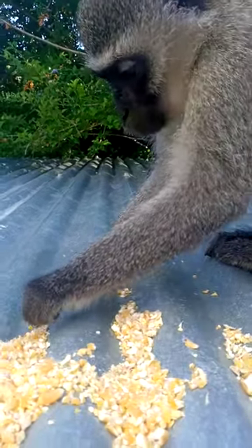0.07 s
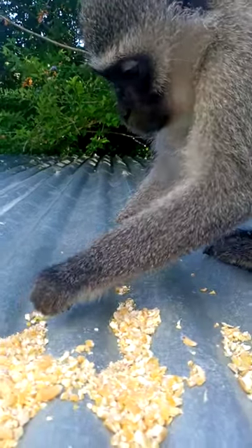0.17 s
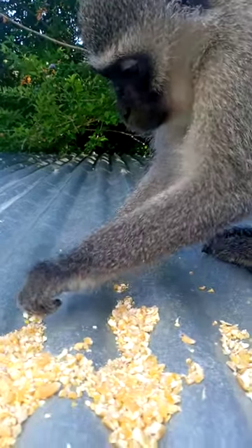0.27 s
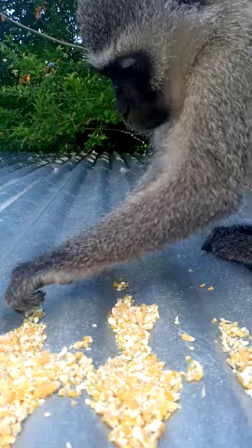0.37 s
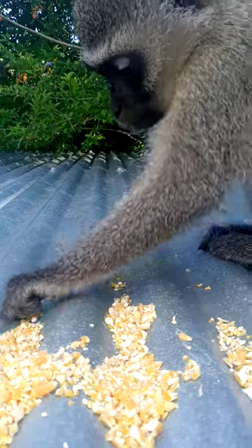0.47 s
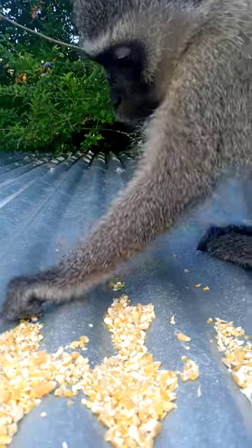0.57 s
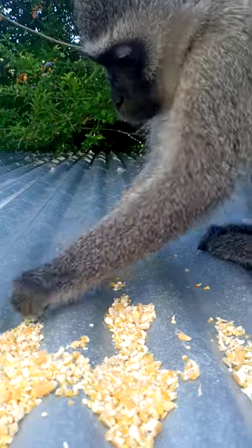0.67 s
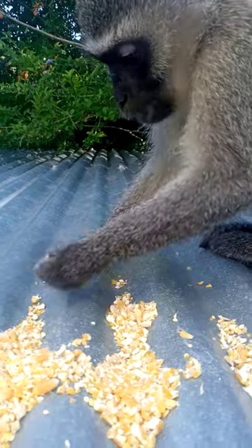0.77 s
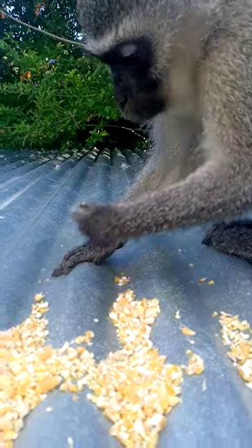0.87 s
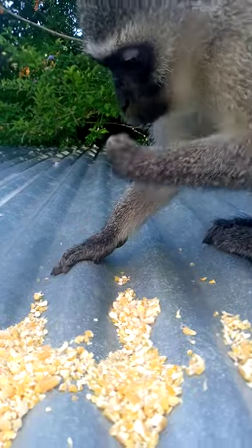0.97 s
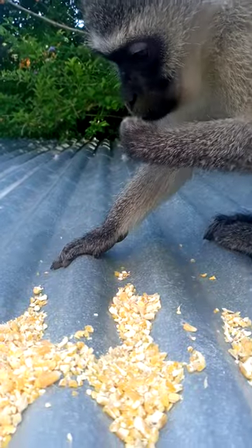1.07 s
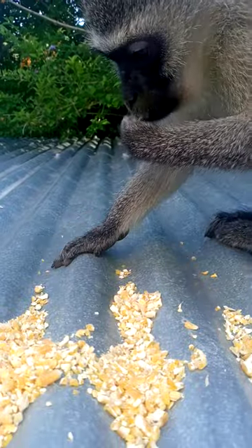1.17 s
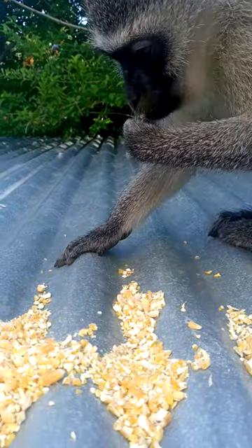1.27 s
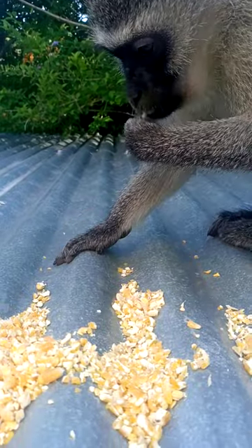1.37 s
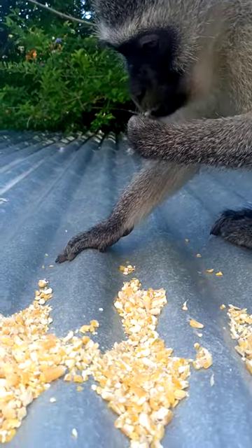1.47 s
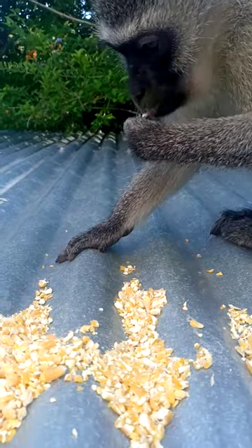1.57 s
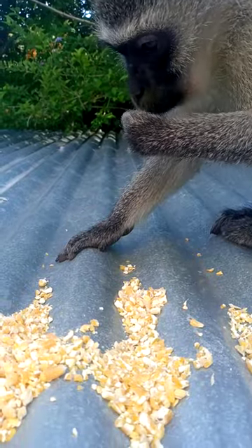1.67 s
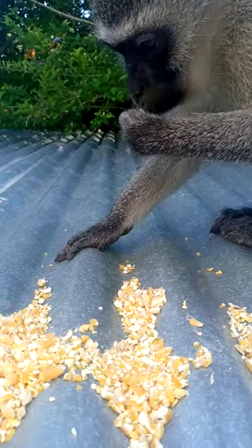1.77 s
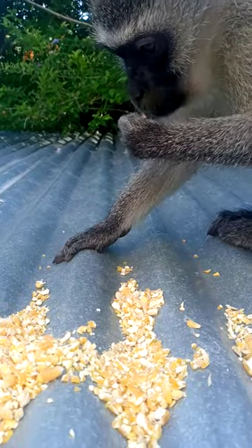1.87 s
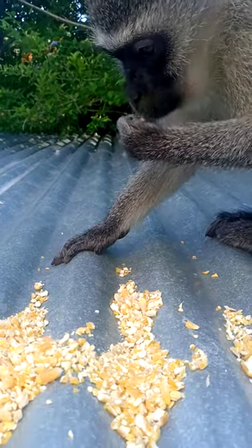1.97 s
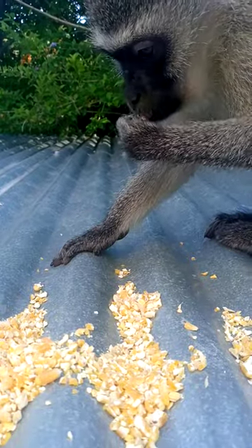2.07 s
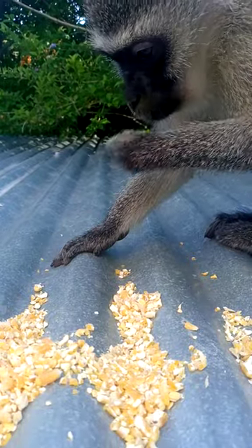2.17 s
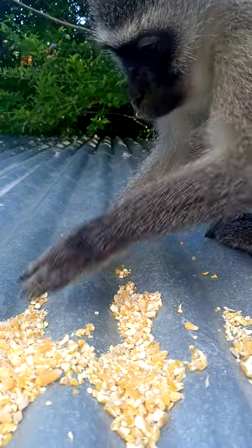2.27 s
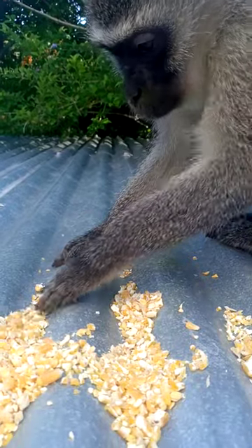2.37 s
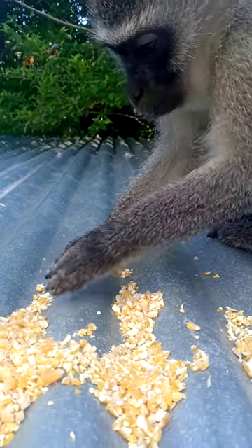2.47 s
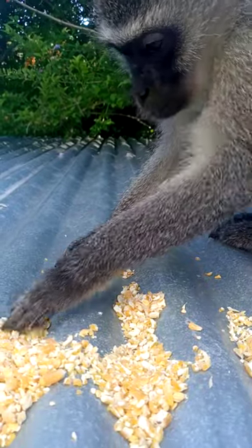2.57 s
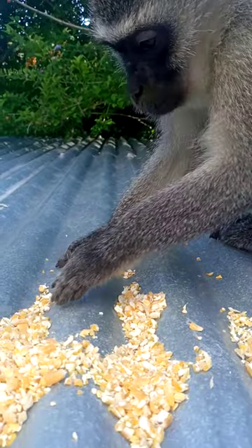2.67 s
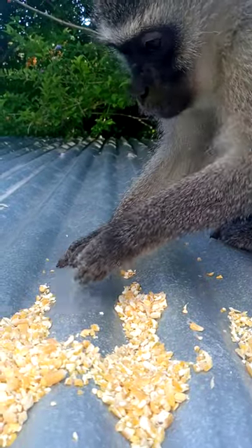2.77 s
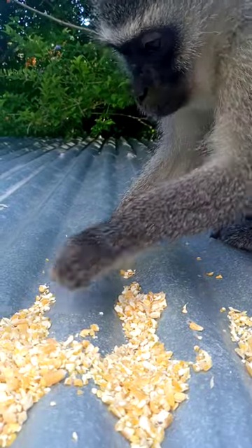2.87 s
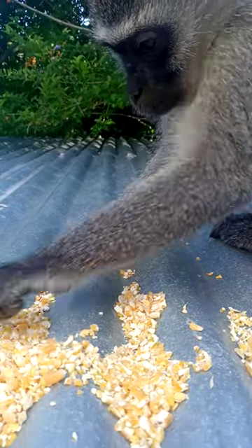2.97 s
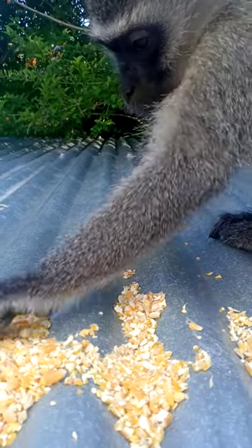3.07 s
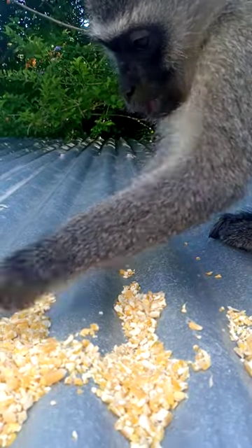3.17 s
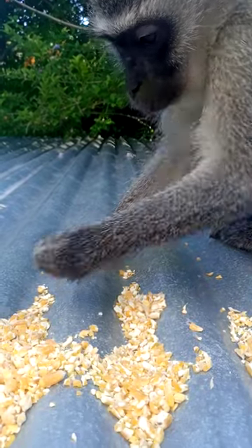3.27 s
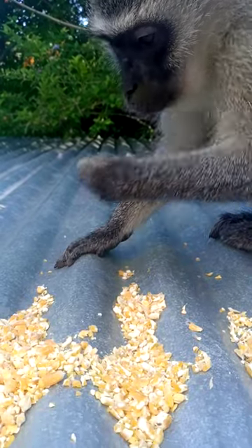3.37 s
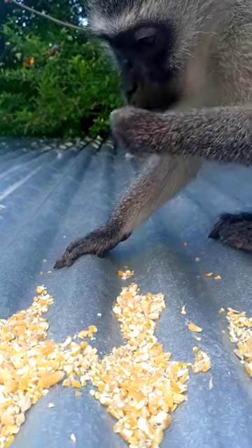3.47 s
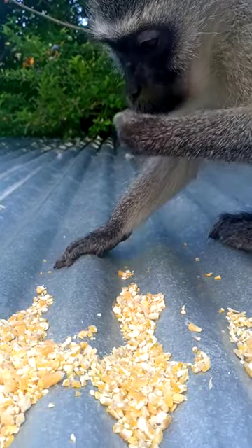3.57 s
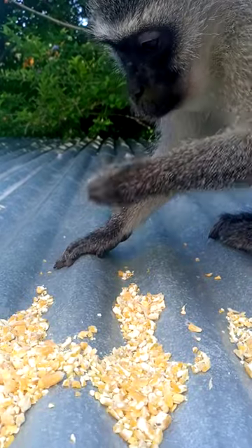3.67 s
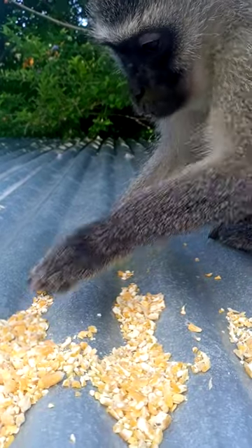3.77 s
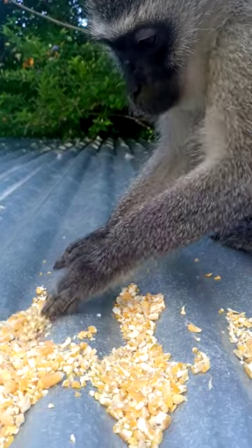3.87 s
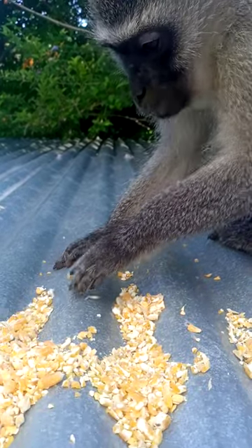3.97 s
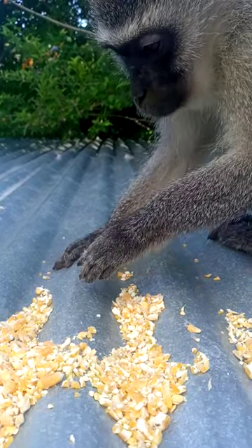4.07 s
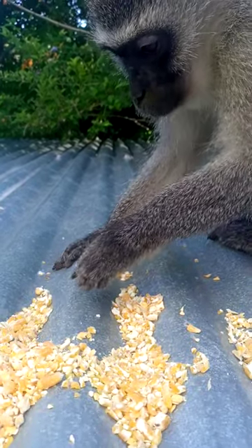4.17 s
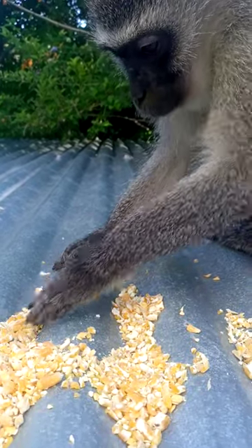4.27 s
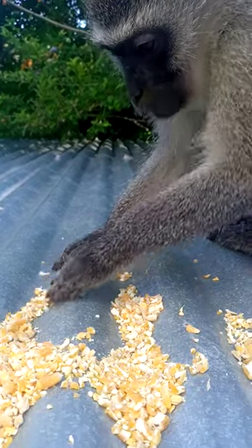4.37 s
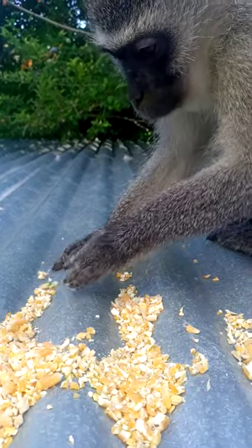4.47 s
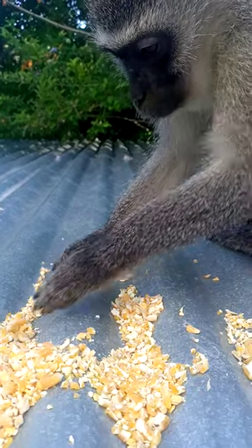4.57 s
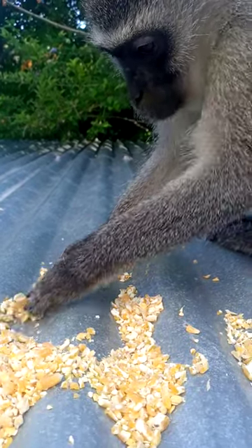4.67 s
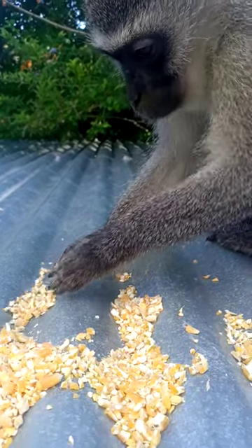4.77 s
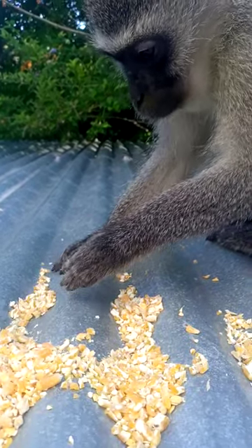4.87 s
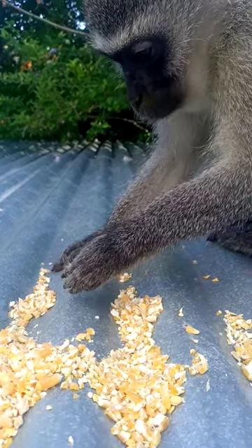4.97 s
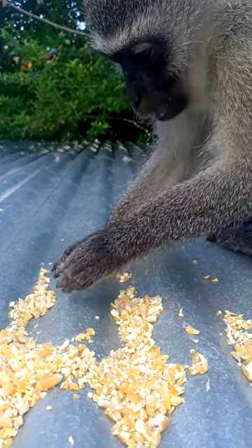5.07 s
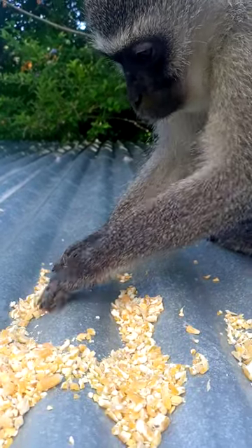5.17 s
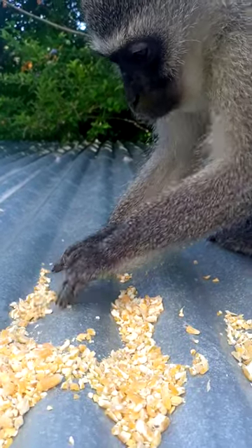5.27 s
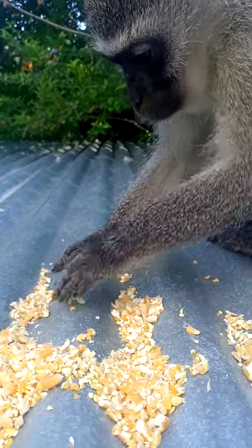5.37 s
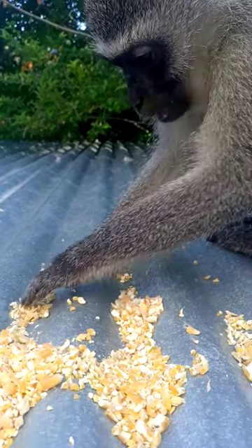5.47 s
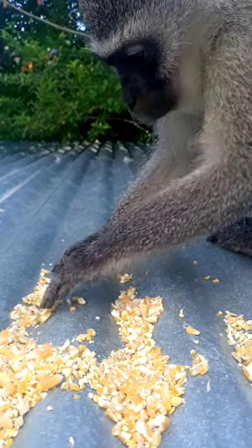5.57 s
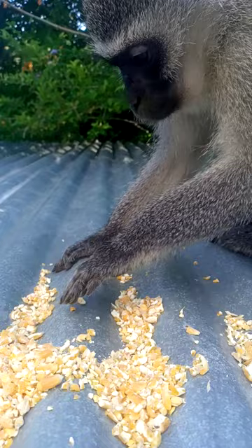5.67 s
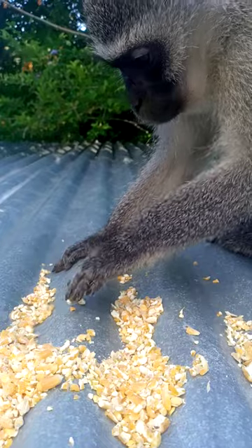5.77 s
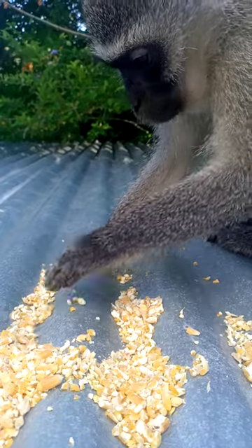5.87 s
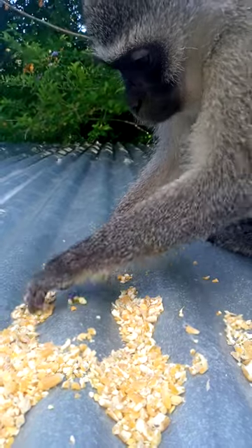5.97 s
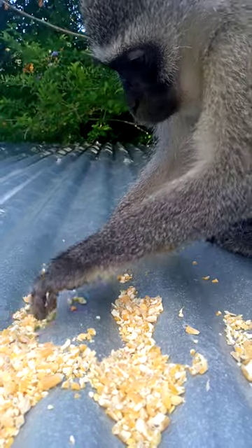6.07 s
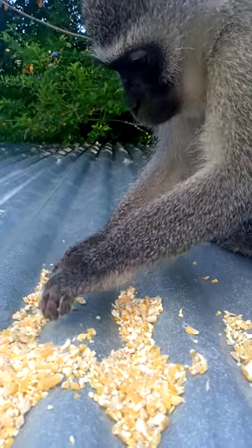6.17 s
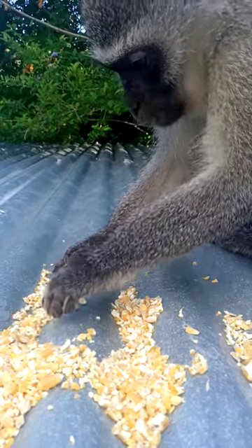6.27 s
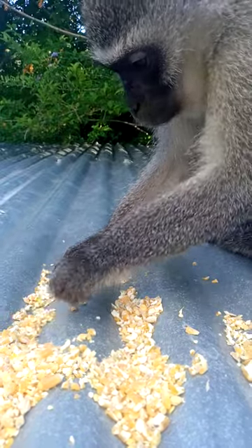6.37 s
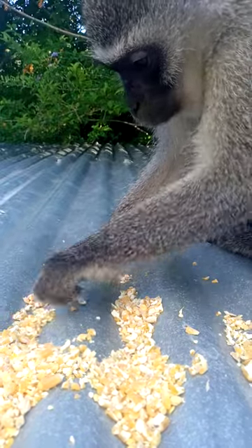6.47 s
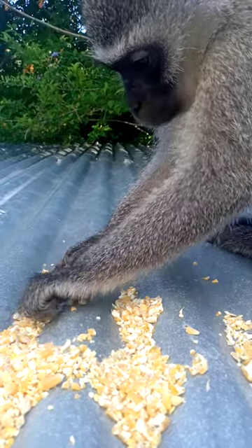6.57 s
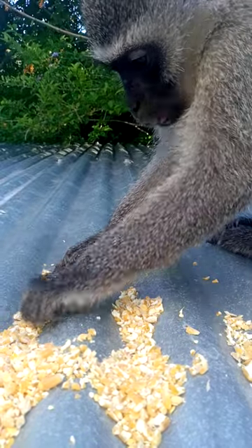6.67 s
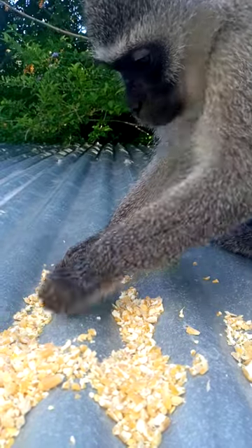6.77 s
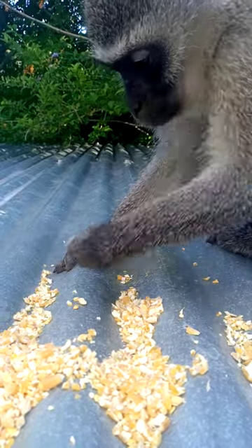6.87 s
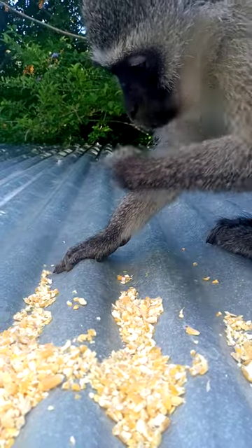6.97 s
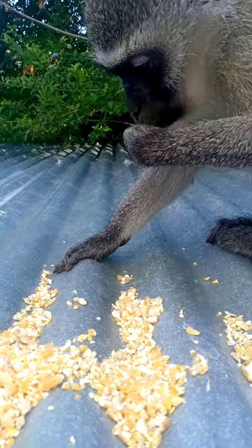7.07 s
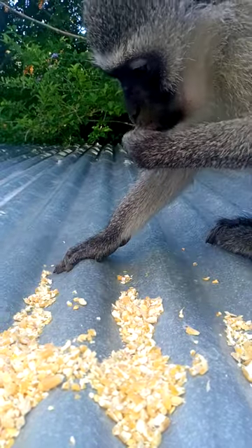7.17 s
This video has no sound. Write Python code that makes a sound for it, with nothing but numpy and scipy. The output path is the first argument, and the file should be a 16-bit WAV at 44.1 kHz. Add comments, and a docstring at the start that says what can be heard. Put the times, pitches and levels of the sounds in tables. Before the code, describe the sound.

A close microphone on a metal roof catches dried kernels ticking, scratching and knocking under short hand strokes, with small dull thuds as weight shifts. An opening scrabble gives way to light tooth clicks and crumbly crunches, then repeated rattling rakes with a dense flurry of hard taps, and finally chewing between strokes. Small birds whistle faintly in the garden, over distant low rumble and airy hush.

```python
"""Dry corn skitters and knocks on a corrugated metal roof, close by, as a monkey rakes it and chews on and off.
Stroke gains shape random kernel clicks that drive the resonances of the sheet; hard knocks are noise bursts.
Chewing is thin bright cracks, and the roof thuds as dying sine tones when its weight shifts.
Birds whistle behind as gliding sines, blurred by foliage, over a low outdoor rumble, hush and air of shaped noise."""
import sys
import numpy as np
from scipy import signal
from scipy.fft import rfft, irfft, next_fast_len
from scipy.io import wavfile
from scipy.ndimage import uniform_filter1d, map_coordinates

SR = 44100
rng = np.random.default_rng(int(sys.argv[2]) if len(sys.argv) > 2 else 0)


def materialize(psi):
    """Save the field psi as 16-bit PCM at rate SR to the path in sys.argv[1].

    A 1-D psi becomes a single channel; in a 2-D psi each row is a channel.
    """
    bounded = np.clip(np.atleast_2d(psi).T, -1, 1)
    quanta = np.round(bounded * 32767).astype(np.int16)
    wavfile.write(sys.argv[1], SR, quanta)


N = 318843

# Strokes of the hand through the corn. Each row: start in seconds, push in seconds, kernel rattle in dB before
# the mix, scrape on the sheet in dB above it, landing weight in dB before the mix, settling in dB per second.
STROKES = [(0.0, 0.029, -51.5, 1, -82, 211), (0.313, 0.086, -62.5, 5.5, -55, 150),
           (.445, .04, -63, -4, -54.5, 150), (.49, 0.14, -51, -2, -51, 128),
           (2.346, 0.084, -38.5, -3, -44.5, 170), (2.591, 0.0071, -43, 7.5, -44.5, 259),
           (2.704, 0.0089, -53.5, -11, -79, 130), (3.042, .015, -38, -12, -76, 252),
           (3.06, 0.0099, -37.5, 4.5, -49, 284), (3.223, 0.012, -55, -25, -78, 147),
           (3.846, 0.12, -40, -0.5, -52, 214), (4.034, 0.037, -44.5, -4, -75, 157),
           (4.32, 0.038, -36, -6.5, -56, 198), (4.409, 0.13, -42.5, -8, -83, 167),
           (4.643, 0.085, -33.5, -4.5, -47, 223), (4.801, 0.017, -43, 0, -48.5, 146),
           (5.19, 0.073, -38.5, -0.5, -55, 115), (5.41, 0.047, -61.5, 8.5, -80, 150),
           (5.501, 0.08, -36, -1, -47, 162), (5.631, 0.059, -43, 1, -74, 261),
           (5.98, 0.041, -36, -6, -53.5, 116), (6.17, 0.15, -64, -19, -78, 197),
           (6.557, 0.0089, -43.5, -0.5, -64, 200), (6.568, 0.032, -44, -0.5, -42.5, 166),
           (6.726, 0.01, -56, 2, -70, 152)]
# The hardest kernels striking the sheet. Each row: start in seconds, peak level in dB before the mix,
# sheet tone in dB against the kernel before trim, pitch of the struck spot in Hz, chatter t60 in seconds.
KNOCKS = [(.291, -19, -8, 1770, 0.011), (0.2997, -14, -18, 1300, 0.0017), (0.4633, -39.5, 9, 5000, 0.015),
          (2.3462, -26.5, -3, 1310, .012), (2.3922, -13, -22, 2660, .02), (2.4194, -25, -7, 2390, .02),
          (2.5916, -25, -3, 1950, 0.01), (2.7035, -23, -25, 2470, 0.018), (3.043, -24, -18, 3050, .014),
          (3.3534, -39, 1.5, 3220, 0.011), (3.8463, -19, -3, 1490, 0.013),
          (3.8915, -17.5, -25, 2400, 0.014), (4.0577, -26, -10, 2730, 0.011),
          (4.3239, -16, -14, 1610, 0.0085), (4.456, -21, -27, 2940, .014),
          (4.4881, -19.5, -15.5, 2400, 0.012), (4.609, -25.5, -27, 2900, 0.0071),
          (4.6441, -17, -9, 1690, .014), (4.7217, -15.5, -12, 2780, .012), (4.741, -14.5, -9, 3030, 0.0085),
          (4.7638, -16, -18, 2860, 0.009), (4.7743, -14, -9, 2720, 0.022), (4.8673, -18, -33, 3040, 0.018),
          (5.364, -23, -25, 2370, 0.011), (5.4155, -30.5, -4, 2750, .006), (5.499, -22, 1.5, 2720, 0.013),
          (5.5085, -14.5, -16, 3030, .016), (5.6524, -22.5, -12, 2390, .012),
          (5.6653, -17, -5.5, 2480, 0.018), (5.9858, -17, -20, 2570, .008), (6.053, -27, -3, 2370, .006),
          (6.5688, -25, -1.5, 1670, 0.015)]
# The loudest chewing clicks and crumbs cracking. Each row: start in seconds, peak level in dB before the mix.
CHEWS = [(0.0312, -37), (0.0942, -42), (0.2532, -35.5), (0.39, -32), (0.4429, -37), (0.7073, -35),
         (0.8932, -45.5), (1.0098, -41), (1.135, -41.5), (1.1802, -46), (1.2237, -41.5), (1.2615, -38.5),
         (1.3244, -41), (1.411, -40.5), (1.4672, -41), (1.6195, -48), (2.0426, -40.5), (2.2128, -37.5),
         (2.2368, -30.5), (2.2438, -36), (2.2779, -37), (2.834, -46), (2.9312, -48), (2.9614, -38.5),
         (4.168, -33), (5.7788, -44.5), (5.901, -38.5), (6.1786, -34), (6.2158, -37), (6.2693, -35.5),
         (6.3668, -31), (6.3825, -33.5), (6.4, -41), (6.4298, -39), (6.7293, -41), (6.796, -46),
         (6.9995, -35)]
# Spells of chewing. Each row: start in seconds, end in seconds.
MOUTHFULS = [(0.05, 1.7), (2.75, 3.35), (5.0, 5.2), (5.75, 7.03)]
# The roof giving under the body or a landing hand. Each row: start in seconds, level in dB, pitch in Hz,
# t60 in seconds.
THUDS = [(0.281, -29, 90, 0.033), (0.343, -46, 124, 0.21), (.374, -40, 134, .1), (.994, -46.5, 83, .2),
         (1.037, -39, 81, 0.1), (1.03, -49.5, 383, .062), (1.242, -43, 171, .11), (2.347, -34, 309, 0.095),
         (2.591, -37, 283, 0.088), (3.065, -38.5, 370, 0.075), (6.569, -32, 318, 0.082)]
# Bird whistles. Each row: start in seconds, length in seconds, start pitch in Hz, end pitch in Hz,
# level in dB before the mix.
BIRDS = [(0.158, 0.1, 4650, 3730, -66), (0.698, 0.048, 1965, 1972, -66), (1.149, .024, 2510, 3840, -54.5),
         (1.175, .025, 4400, 4780, -63), (1.229, .11, 5900, 4490, -63.5), (1.209, 0.23, 2310, 1620, -73.5),
         (1.317, 0.047, 3640, 4030, -69.5), (1.366, 0.082, 4190, 3657, -64.5),
         (1.551, 0.016, 6500, 5440, -56), (1.529, 0.15, 2253, 2086, -70.5),
         (1.691, 0.04, 3400, 4530, -59.5), (1.705, 0.095, 2960, 2660, -64),
         (1.85, 0.054, 4630, 5810, -57.5), (1.955, 0.038, 6000, 4660, -55),
         (2.927, 0.052, 4450, 3830, -65.5), (3.4, .12, 3900, 3400, -79.5), (4.952, 0.083, 4150, 4480, -63),
         (5.016, .06, 4800, 5000, -66), (4.957, .099, 3050, 2427, -65), (5.798, 0.054, 4210, 3770, -58),
         (5.947, .028, 6400, 5260, -53), (6.273, 0.026, 4900, 5830, -54), (6.354, 0.047, 5900, 4510, -59),
         (6.847, 0.019, 3290, 3700, -52), (6.847, 0.012, 2350, 2980, -57),
         (6.866, 0.011, 2630, 4180, -42.5), (7.02, 0.058, 2180, 1990, -73.5)]
# Broad resonances of the sheet. Each row: centre in Hz, width in Hz, relative level in dB.
SHEET_MODES = [(1355, 320, -3), (1740, 380, -0.5), (2430, 530, 2), (2680, 81, 6.5), (3035, 58, -7),
               (3380, 200, -9.5), (4352, 110, 1), (5670, 61, 3.5)]
# Long-ringing modes of the sheet. Each row: centre in Hz, width in Hz, relative level in dB.
RING_MODES = [(1736, 42, -7), (2432, 56, -6), (2748, 8.4, -16), (2977, 31, 10.5), (4460, 21, -5)]
# Low resonances of the roof panel. Each row: centre in Hz, width in Hz, relative level in dB.
PANEL_MODES = [(327, 68, 4.5), (528, 240, -7), (846, 39, -2), (1180, 71, -6.5)]
# A corn kernel's click as the microphone hears it, with its peaks near 7 and 15 kHz.
# Each row: frequency in Hz, relative level in dB.
KERNEL_AT_MIC = [(300, -28.5), (1000, -17), (3300, -10), (5300, -7.5), (6400, 2.5), (7400, 1), (8400, -13),
                 (10500, -15), (13500, -15), (14500, -6), (15300, 5.5), (16000, -36)]
# A tooth click as the microphone hears it, with its peaks near 7 and 15 kHz.
# Each row: frequency in Hz, relative level in dB.
TOOTH_AT_MIC = [(500, -54), (3000, -21.5), (5500, -5.5), (7200, 5), (8800, -11.5), (11000, -13),
                (13300, -17), (15300, -1), (16000, -1.5)]
# Colour of the distant rumble. Each row: frequency in Hz, relative level in dB.
RUMBLE_COLOUR = [(25, -69), (50, -23), (80, -2.5), (160, 4.5), (220, -2.5), (350, -16), (700, -42),
                 (2000, -80)]
# Colour of the mid-pitched hush. Each row: frequency in Hz, relative level in dB.
HUSH_COLOUR = [(400, -25), (780, -15.5), (930, 4), (1080, -1.5), (1350, -13.5), (2500, -33)]
# The garden air as the microphone hears it, with its peaks near 7 and 15 kHz.
# Each row: frequency in Hz, relative level in dB.
AIR_AT_MIC = [(300, -7.5), (600, -7), (1300, -10), (2200, -12.5), (4000, -9.5), (5500, -13.5), (7200, -2.5),
              (8600, -37), (11000, -25.5), (13500, -52), (15300, -9.5), (16000, -25.5)]
# Swells of the rumble. Each row: time in seconds, level in dB before a random drift.
RUMBLE_SWELLS = [(0, -61.5), (.2, -68.5), (.36, -57), (.8, -68.5), (1.05, -58), (1.7, -63.5), (2.45, -61),
                 (2.85, -65), (3.2, -61), (3.85, -66.5), (4.2, -59), (4.4, -73), (5.1, -62), (6.15, -64.5),
                 (6.5, -67.5), (7.23, -67.5)]
# Swells of the garden air and hush. Each row: time in seconds, level in dB before the mix.
AIR_SWELLS = [(0, -60), (.8, -65), (1.25, -60.5), (2.1, -66), (3.25, -63.5), (3.5, -68), (3.8, -64.5),
              (5.1, -62), (6.2, -59), (6.5, -65), (7.23, -67)]

LANDING_S, SAG_DB_PER_S = 0.0052, 10  # the hand lands at once, then its push eases
WEIGHT_DB_PER_S, PANEL_SHARE_DB = 261, -22.5  # the landing dies away; the scrape keeps the panel moving
CLUMP_DB, CLUMPS_PER_S = 2.5, 110  # kernels give way in clumps
SPOT_COLOUR_DB = 3.5  # the sheet answers differently as the hand moves from spot to spot
CLICK_DB = -9.5  # the sharp click inside a knock, against the knock's level
CRUMBS_PER_S, CRUMB_DB, CRUMB_SPREAD_DB = 16, -49.5, 5  # faint cracks, levels before the mix
GLIDE_BEND = 0.435  # a whistle glides faster at first, then slows
HALF_BLURRED_DB, BLUR_RANGE_DB = -61.5, 9.5  # fainter birds sit deeper in the foliage
TOP_HZ = 16100  # upper band limit of the sound


def raking():
    """Fingers push clumps of kernels along; each contact clicks and drives the sheet."""
    rattle, scrape, weight = pushes()
    clumps = amp(CLUMP_DB * wobble(CLUMPS_PER_S))
    mass = unit(contacts(per_second=9000, spread_db=1.5) * clumps)

    # a hard push moves a dense mass; as it eases, single kernels stand out
    dense = .25 + .65 * rattle / (rattle + amp(-44))
    packed = unit(through(mass, colour(KERNEL_AT_MIC)))
    grains = np.sqrt(dense) * packed + np.sqrt(1 - dense) * loose_kernels(count=12)

    # gentle contacts are duller
    gentle = 1 / (1 + rattle / amp(-55))
    treble = signal.filtfilt(*signal.butter(4, 8200, 'high', fs=SR), grains)
    kernels = amp(-1.0) * rattle * (grains - gentle * treble)

    # sliding kernels scratch the sheet and hopping ones tap it
    hops = unit(contacts(per_second=170, spread_db=3))
    scratches = unit(contacts(per_second=3500, spread_db=3) * clumps)
    sliding = scratches + .5 * mass + .65 * hops
    sheet = amp(-3.0) * scrape * patchy(through(sliding, resonances(SHEET_MODES)), SPOT_COLOUR_DB)
    ring = amp(-15) * scrape * unit(through(sliding, resonances(RING_MODES, size=8192)))
    panel_tone = through(sliding, resonances(PANEL_MODES))
    panel = amp(2.5) * weight * patchy(panel_tone, SPOT_COLOUR_DB, size=1024)
    return kernels + sheet + ring + panel


def pushes():
    """Gains of rattle, scrape and weight: each stroke lands, eases off and leaves the kernels to settle."""
    power = np.zeros((3, N))
    for s, push_s, rattle_db, scrape_db, weight_db, settle in STROKES:
        t = np.arange(N) / SR - s
        landing = np.clip(t / LANDING_S + .5, 0, 1)
        t = np.maximum(t, 0)
        sag_db = SAG_DB_PER_S * np.minimum(t, push_s)
        settled_db = settle * np.maximum(t - push_s, 0)
        level_db = rattle_db - sag_db - settled_db
        gains = amp([level_db, level_db + scrape_db, weight_db - WEIGHT_DB_PER_S * t])
        power += (landing * gains) ** 2
    rattle, scrape, weight = np.sqrt(power)
    return rattle, scrape, np.hypot(weight, amp(PANEL_SHARE_DB) * scrape)


def loose_kernels(count):
    """Sparse ticks from count kernels, each with its own colour and a few milliseconds of chatter."""
    ticks = np.zeros(N)
    for _ in range(count):
        shape = colour(varied(KERNEL_AT_MIC, spread_db=4.5), size=1024)
        chatter = crack(shape, t60=.004)
        ticks += unit(through(contacts(per_second=8, spread_db=3.5), chatter))
    return unit(ticks)


def knocks():
    """A kernel hits the roof: a burst of chatter and the brief tone of the spot, with a sharp click 1 ms in."""
    out = np.zeros(N)
    for s, db, tone_db, spot_hz, t60 in KNOCKS:
        kernel = colour(varied(KERNEL_AT_MIC, spread_db=2))
        spot = resonances([(spot_hz, 0.57 * spot_hz, 0)])
        tone = crack(through(spot, spot), t60)
        burst = crack(kernel, t60) + amp(tone_db + 5.5) * tone
        add(out, s, amp(db - 8.0) * burst)
        click = kernel / np.abs(kernel).max() + amp(tone_db + 6.5) * spot / np.abs(spot).max()
        add(out, s + .001, amp(db + CLICK_DB) * click)
    return out


def crack(response, t60):
    """A burst of micro-fractures: noise dying within milliseconds through a response, peak 1."""
    t = np.arange(SR // 10) / SR
    swell = 1 - np.exp(-t / .0005)
    fractures = rng.standard_normal(len(t)) * swell * amp(-60 * t / t60)
    burst = through(fractures, response)
    return burst / np.abs(burst).max()


def chewing():
    """Thin bright clicks of dry corn breaking, each with a colour of its own, and a short wash behind."""
    out = np.zeros(N)
    for s, db in [*CHEWS, *crumbs()]:
        tooth = colour(varied(TOOTH_AT_MIC, spread_db=3))
        add(out, s, amp(db + 3.0) * crack(tooth, t60=0.0082))
    return out + amp(-5.5) * through(out, tail(t60=.1))


def crumbs():
    """Start in seconds and level in dB of faint cracks at random moments of each mouthful."""
    starts = np.cumsum(rng.exponential(size=300)) / CRUMBS_PER_S
    levels_db = CRUMB_DB + CRUMB_SPREAD_DB * rng.standard_normal(size=300)
    return [(s, db) for s, db in zip(starts, levels_db)
            if any(start < s < end for start, end in MOUTHFULS)]


def thuds():
    """Soft low pushes on the roof: sine tones that swell in quickly and die away."""
    out, t = np.zeros(N), np.arange(SR // 2) / SR
    onset = 1 - np.exp(-t / 0.0039)
    for s, db, hz, t60 in THUDS:
        add(out, s, amp(db - 60 * t / t60) * np.sin(2 * np.pi * hz * t) * onset)
    return out


def birds():
    """Gliding whistles; the more foliage they cross, the more they flutter and echo."""
    direct, scattered = np.zeros((2, N))
    for s, length, start_hz, end_hz, db in BIRDS:
        blur = .5 - .5 * np.tanh((db - HALF_BLURRED_DB) / BLUR_RANGE_DB)
        u = np.linspace(0, 1, int(length * SR))  # progress through the note
        hz = start_hz + (end_hz - start_hz) * (u + GLIDE_BEND * u * (1 - u))
        hz = hz * (1 + 0.042 * blur * wobble(891)[:len(u)])
        envelope = np.abs(np.sin(np.pi * u)) ** 0.16
        note = amp(db) * envelope * np.sin(2 * np.pi * np.cumsum(hz) / SR)
        add(direct, s, np.sqrt(1 - blur) * note)
        add(scattered, s, np.sqrt(0.054 + blur) * note)
    return amp(1.5) * direct + amp(1.5) * through(scattered, tail(t60=.36))


def outdoors():
    """A swelling distant rumble, a mid-pitched hush and the patchy rustle of the garden, all shaped noise."""
    rumble_db, = curves(RUMBLE_SWELLS)
    air_db, = curves(AIR_SWELLS)
    rumble = unit(noise(RUMBLE_COLOUR)) * amp(rumble_db + 2.17 * wobble(12))
    hush_gain = amp(air_db - 6.5 + 1.2 * wobble(11))
    hush = patchy(noise(HUSH_COLOUR), depth_db=2.5, size=1024) * hush_gain
    air = patchy(noise(AIR_AT_MIC), depth_db=5.5) * amp(air_db - 5.5)
    return rumble + hush + air


def noise(spectrum):
    """Steady noise with the colour of a (Hz, dB) spectrum."""
    return through(rng.standard_normal(N), colour(spectrum))


def patchy(x, depth_db, size=512):
    """Let the colour of a sound drift in random patches of time and pitch; rms 1."""
    z = signal.stft(x, nperseg=size)[2]
    across_pitch = uniform_filter1d(rng.standard_normal(z.shape), size=4, axis=0)
    patches = unit(uniform_filter1d(across_pitch, size=12, axis=1))
    return unit(signal.istft(z * amp(depth_db * patches), nperseg=size)[1][:N])


def contacts(per_second, spread_db):
    """Random tiny impacts of either sign, a few much harder than the rest."""
    hardness = amp(spread_db * np.minimum(rng.exponential(size=N), 3))
    return (rng.random(N) < per_second / SR) * hardness * rng.choice([-1, 1], N)


def tail(t60):
    """A dying wash of reflections of energy 1, dull in the top octave."""
    t = np.arange(SR) / SR
    dull = signal.lfilter(*signal.butter(4, 7200, fs=SR), rng.standard_normal(SR))
    wash = dull * amp(-60 * t / t60)
    return wash / np.linalg.norm(wash)


def resonances(modes, size=4096):
    """Impulse response of resonances given as (centre Hz, width Hz, dB)."""
    f = np.fft.rfftfreq(size, 1 / SR)
    return irfft(sum(amp(db) * 1j * f * w / (c * c - f * f + 1j * f * w) for c, w, db in modes))


def colour(points, size=4096):
    """Causal impulse response with a (Hz, dB) spectrum, made minimum-phase by folding its cepstrum."""
    hz, db = np.transpose(points)
    log_f = np.log(np.fft.rfftfreq(size, 1 / SR) + 1)
    cepstrum = irfft(np.log(amp(np.interp(log_f, np.log(hz), db))))
    cepstrum[1:size // 2] *= 2
    cepstrum[size // 2 + 1:] = 0
    return irfft(np.exp(rfft(cepstrum)))


def varied(points, spread_db):
    """A (Hz, dB) spectrum with each level randomly shifted."""
    return [(hz, level + spread_db * rng.normal()) for hz, level in points]


def through(x, response):
    """Convolve, keeping the length."""
    return signal.fftconvolve(x, response)[:len(x)]


def add(track, s, sound):
    """Mix a sound into the track at time s in seconds."""
    start = max(round(s * SR), 0)
    track[start:start + len(sound)] += sound[:N - start]


def wobble(rate):
    """A smooth random curve, rate knots a second."""
    return map_coordinates(rng.standard_normal(int(N * rate / SR) + 4), [np.arange(N) * rate / SR])


def curves(rows):
    """One value per sample for each column after the time."""
    s, *cols = np.transpose(rows)
    return [np.interp(np.arange(N) / SR, s, c) for c in cols]


def unit(x):
    """Scale to rms 1."""
    return x / np.sqrt(np.mean(x ** 2) + 1e-20)


def amp(db):
    """Decibels to gain."""
    return 10 ** (np.asarray(db) / 20)


def scene():
    """Corn on the faintly ringing roof, with the garden behind."""
    corn = raking() + knocks()
    roof = amp(-13.0) * through(corn, tail(t60=0.16))
    return (corn + roof + outdoors() + thuds() + birds() + chewing())[None]


def record(dry):
    """Cut everything from the band limit up."""
    size = next_fast_len(N + SR // 2)
    passed = np.fft.rfftfreq(size, 1 / SR) < TOP_HZ
    return irfft(rfft(dry, size) * passed, size)[:, :N]


dry = scene()
out = record(dry)
materialize(out)
```